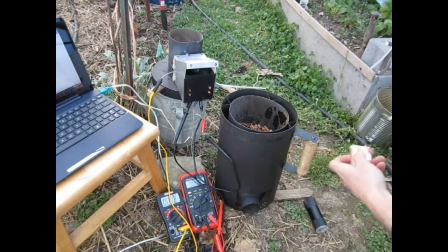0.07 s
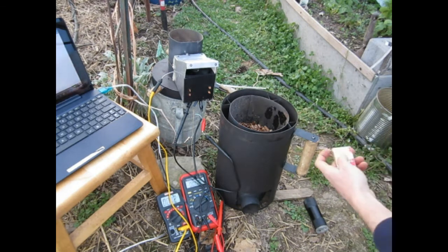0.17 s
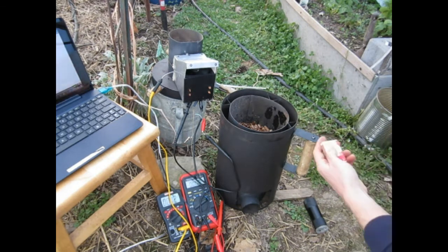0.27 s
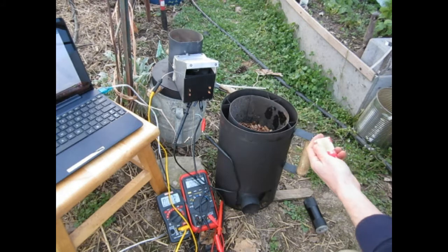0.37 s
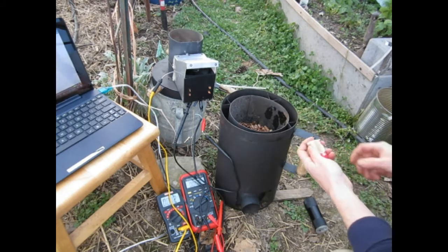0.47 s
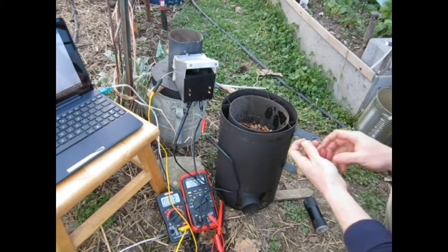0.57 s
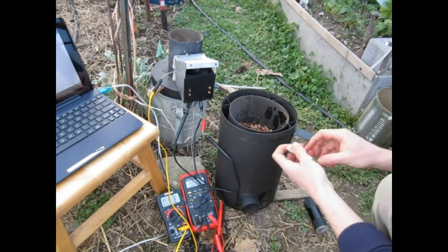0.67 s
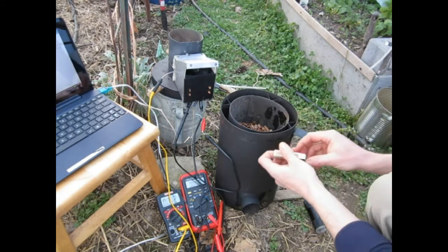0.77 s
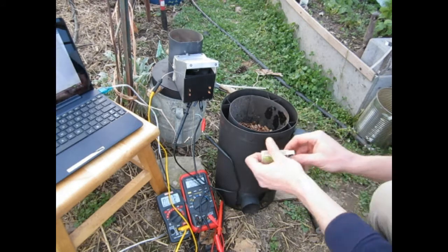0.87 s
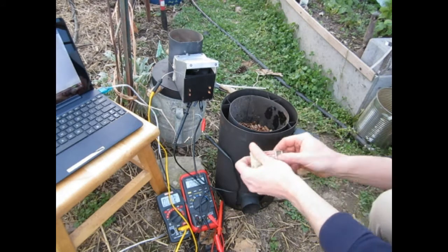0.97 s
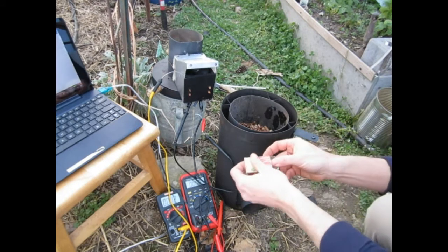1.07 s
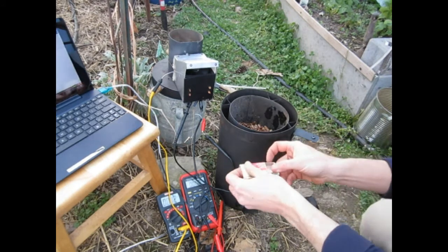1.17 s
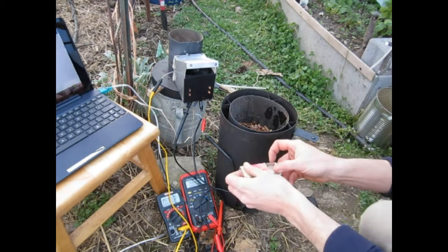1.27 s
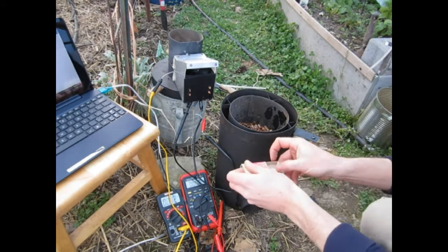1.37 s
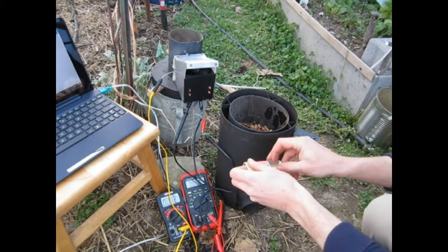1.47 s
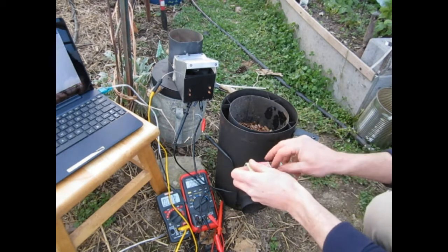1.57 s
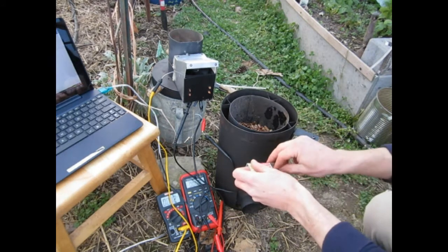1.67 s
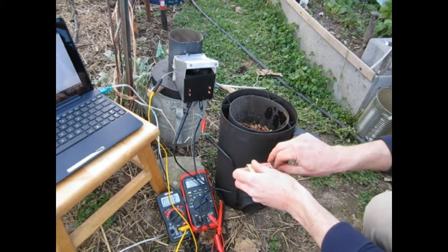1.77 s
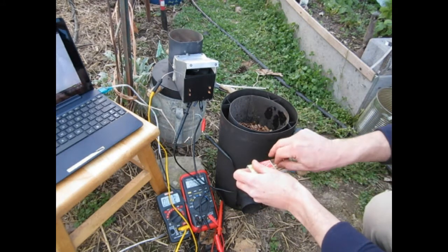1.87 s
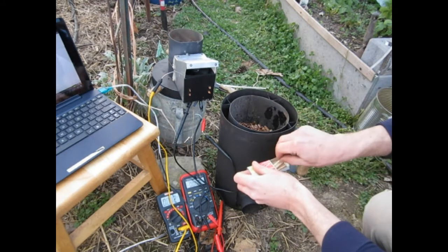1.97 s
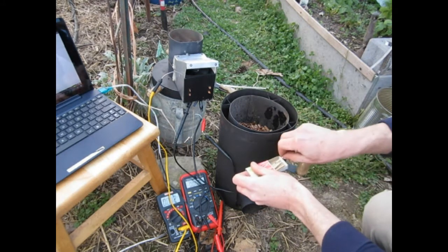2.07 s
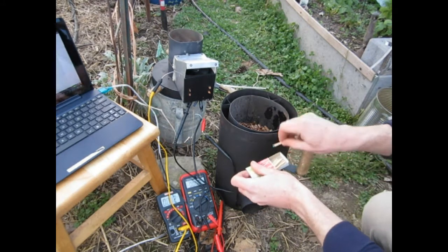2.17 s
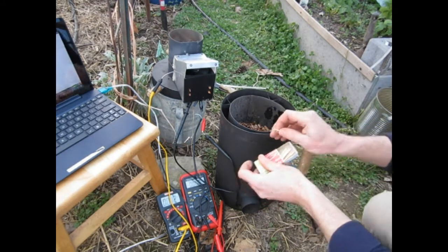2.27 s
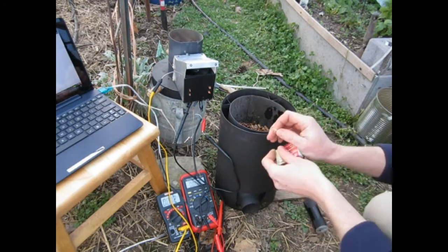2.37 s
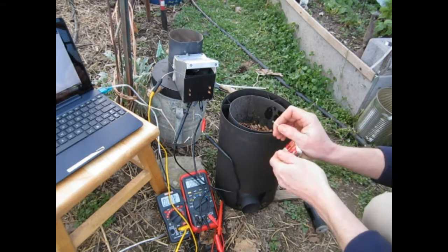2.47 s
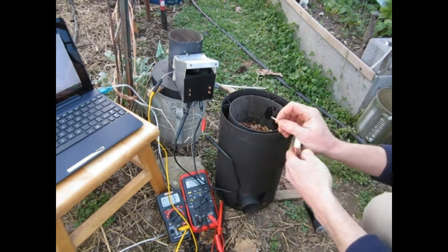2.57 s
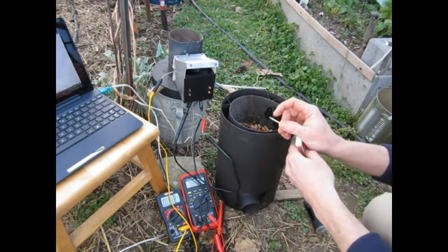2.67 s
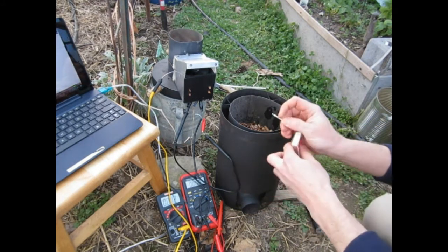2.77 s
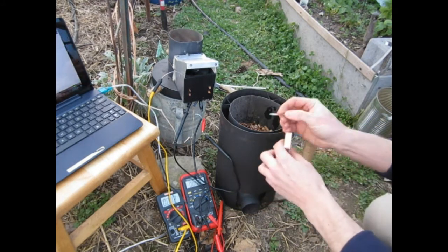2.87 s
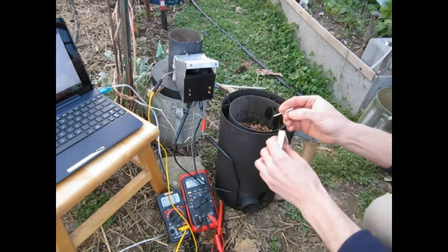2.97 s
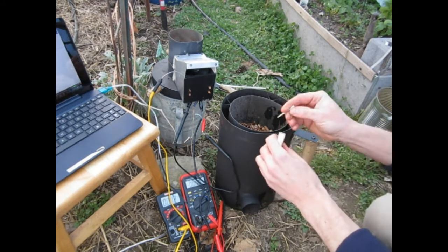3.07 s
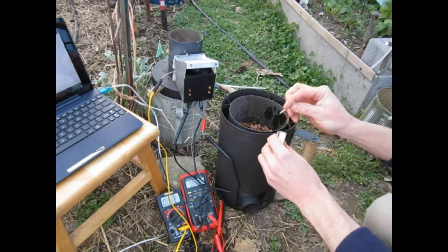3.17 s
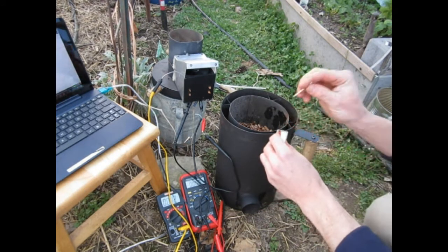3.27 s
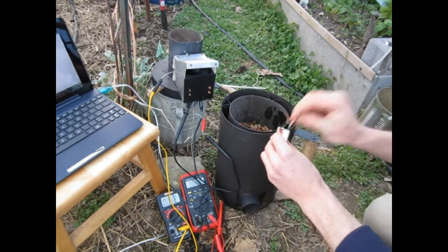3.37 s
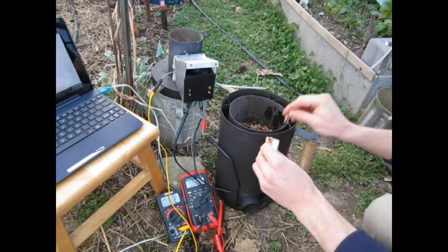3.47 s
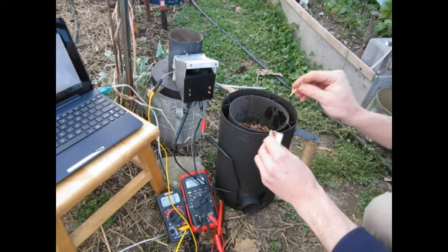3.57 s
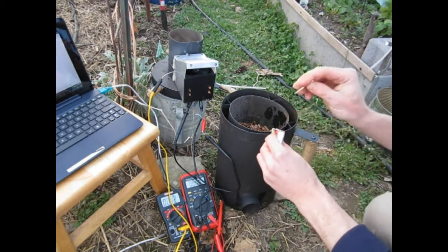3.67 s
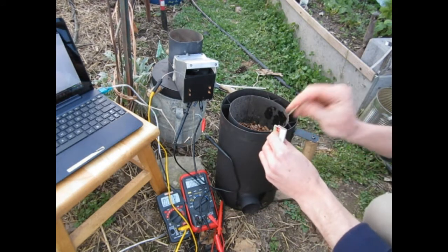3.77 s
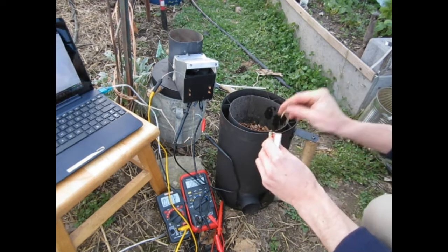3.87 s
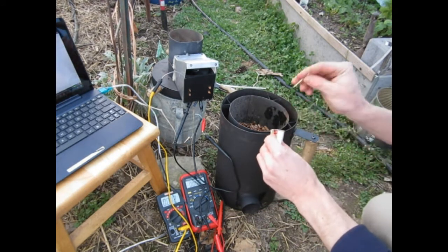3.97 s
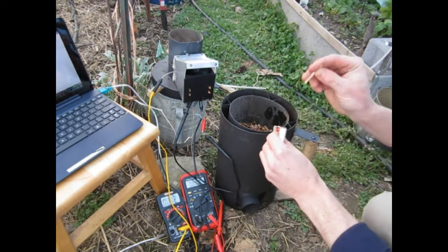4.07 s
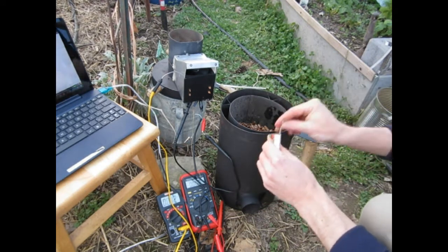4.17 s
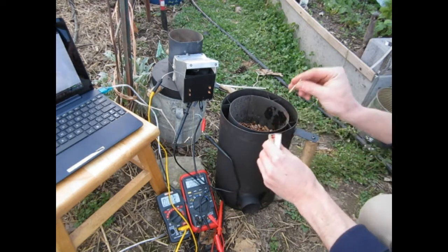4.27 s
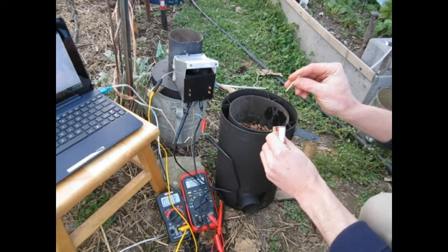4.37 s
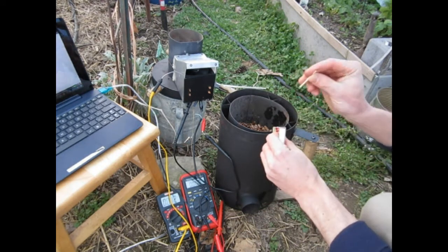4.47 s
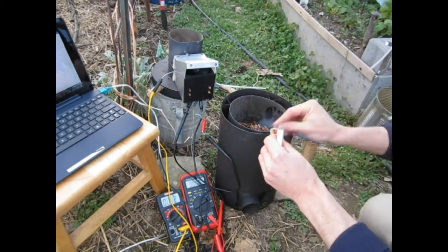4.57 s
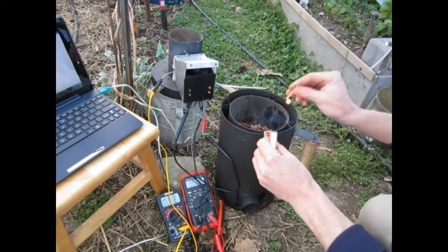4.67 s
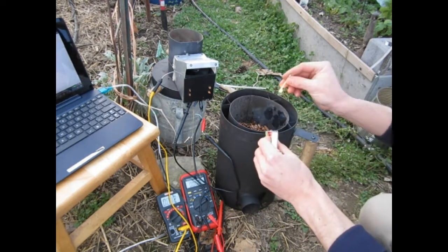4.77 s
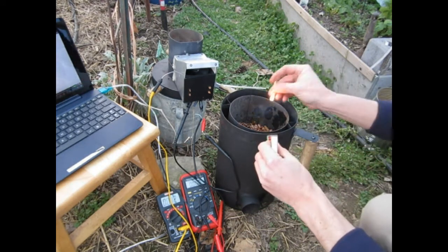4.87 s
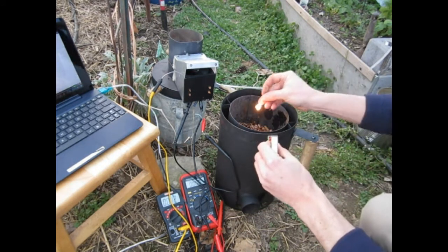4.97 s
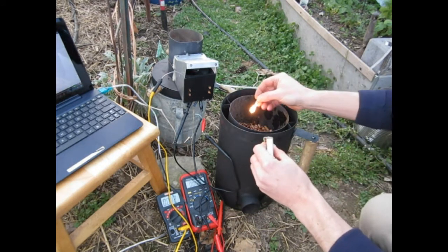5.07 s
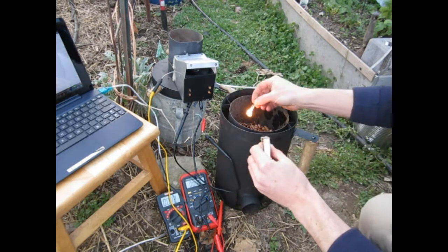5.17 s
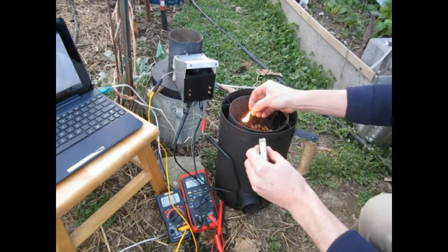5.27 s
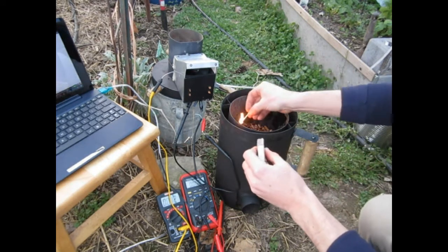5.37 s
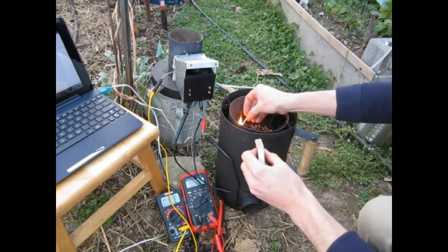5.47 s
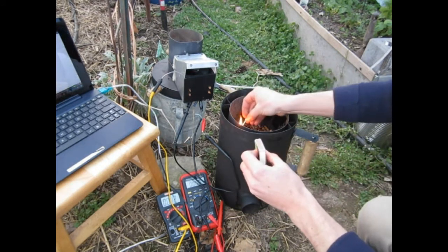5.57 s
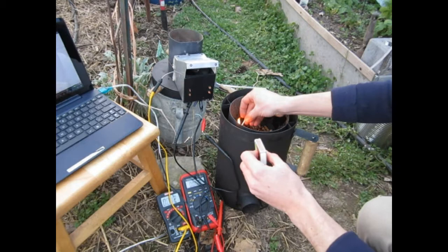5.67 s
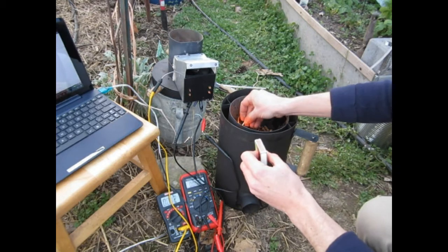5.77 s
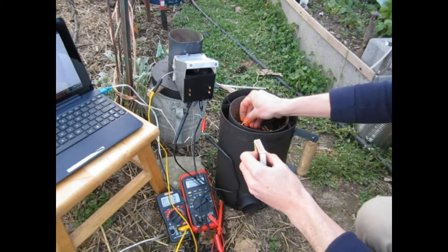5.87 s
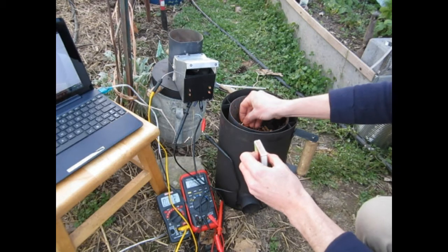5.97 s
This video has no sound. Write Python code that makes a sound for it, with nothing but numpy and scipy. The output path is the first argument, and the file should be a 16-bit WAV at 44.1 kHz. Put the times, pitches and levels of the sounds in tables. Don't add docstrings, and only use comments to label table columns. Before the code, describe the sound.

Outdoors, close to the microphone, hands fumble a small matchbox: dry card slides, hollow knocks, light wooden sticks ticking. The tray snaps shut with bright clacks. Four separate raspy strikes follow, the last by far the loudest, igniting with a thin spit. Fine crackling and fizz continue, briefly hollow inside a drum. Behind lie soft garden hiss, a low distant engine, a faint steady camera whine and a tiny late bird call.

```python
import sys
import numpy as np
from scipy import signal
from scipy.fft import rfft, irfft, next_fast_len
from scipy.io import wavfile
from scipy.ndimage import map_coordinates

SR = 44100
rng = np.random.default_rng(int(sys.argv[2]) if len(sys.argv) > 2 else 0)


def wrap_up_sound(samples):
    columns = np.atleast_2d(samples).T
    tamed = np.clip(columns, -1, 1)
    steps = np.round(tamed * 32767).astype(np.int16)
    wavfile.write(sys.argv[1], SR, steps)


def to_linear_factor(level_db):
    exponent = np.asarray(level_db, float) / 20
    return 10 ** exponent


N = 265041


def unit(x):
    return x / np.sqrt(np.mean(x ** 2) + 1e-20)


def curves(rows):
    time_s, *columns = np.transpose(rows)
    return [np.interp(np.arange(N) / SR, time_s, column) for column in columns]


def phase(hz):
    return 2 * np.pi * np.cumsum(hz) / SR


def shape(points):
    point_hz, point_db = np.transpose(points)
    return lambda f: to_linear_factor(np.interp(np.log(f + 1), np.log(point_hz), point_db, -90, -90))


def modes(table):
    def response(f):
        total = 0
        for k, (hz, width_hz, db) in enumerate(table):
            damping = 1j * f * width_hz
            total = total + (-1) ** k * to_linear_factor(db) * damping / (hz * hz - f * f + damping)
        return total
    return response


def above(edge_hz):
    return lambda f: f * f / (f * f - edge_hz ** 2 - 1.4j * f * edge_hz)


def filtered(x, response):
    m = next_fast_len(len(x) + 4096)
    gain = response(np.fft.rfftfreq(m, 1 / SR))
    gain = gain / np.sqrt(np.mean(np.abs(gain) ** 2))
    return irfft(rfft(x, m) * gain, m)[:len(x)]


def wobble(rate):
    knots = rng.standard_normal(int(N * rate / SR) + 4)
    return map_coordinates(knots, [np.arange(N) * rate / SR])


# start_s, level_db
AIR = [(0, -54.5), (.33, -52), (.9, -51.5), (1.3, -56), (1.74, -58), (2.3, -56.5), (2.86, -59),
       (3.5, -57.5), (4.5, -58), (5.2, -57.5), (6.01, -58)]
# freq_hz, density_db_per_hz
GARDEN = [(13, -71), (22, -14), (110, -15.5), (170, -18), (315, -19), (486, -19.5), (815, -20.5),
          (1440, -25), (3260, -31), (7980, -36), (14500, -42.5)]
# start_s, pitch_hz, level_db
BIRD = [(5.68, 13700, -100), (5.69, 13620, -69), (5.72, 13310, -68), (5.79, 13300, -72.5),
        (5.84, 12100, -76), (5.86, 12750, -72), (5.9, 12500, -72), (5.95, 10600, -86), (5.97, 10500, -100)]


def garden():
    duck_s, duck_db, recover_s = 4.6, 8.5, 0.53
    since_s = np.arange(N) / SR - duck_s
    gain_db = -duck_db * (since_s > 0) * np.exp(-np.abs(since_s / recover_s) ** 2)

    hiss_db = curves(AIR)[0] + gain_db + 4.0 + 0.8 * wobble(6)
    hiss = to_linear_factor(hiss_db) * filtered(rng.standard_normal(N), shape(GARDEN))

    turn = phase(63 + 3.2 * wobble(8))
    drone_db = -55.5 + gain_db + 1.4 * wobble(5.3)
    drone = to_linear_factor(drone_db) * (np.sin(turn) + 0.33 * np.sin(2 * turn))

    call_hz, call_db = curves(BIRD)
    call = to_linear_factor(call_db + 1.1 * wobble(70)) * np.sin(phase(call_hz))

    whine_db = -71.5 + gain_db + 2 * wobble(90)
    whine = to_linear_factor(whine_db) * np.sin(2 * np.pi * 7854 * np.arange(N) / SR + 0.9 * wobble(150))
    return hiss + drone + call + whine


def yard(x):
    hop = SR // 8
    t = np.arange(hop) / SR
    parts = np.pad(x, (0, -N % hop)).reshape(-1, hop)
    tails = rng.standard_normal(parts.shape) * to_linear_factor(-60 * t / 0.093) * (t > 0.002)
    tails = tails / np.linalg.norm(tails, axis=1, keepdims=True)
    wet = signal.fftconvolve(parts, tails, axes=1)
    within = wet[:, :hop].ravel()
    spill = np.pad(wet[:, hop:], ((0, 0), (0, 1))).ravel()
    return (np.pad(within, (0, hop)) + np.pad(spill, (hop, 0)))[:N]


# start_s, peak_db, pitch_hz, t60_s
THUDS = [(0.08, -29.5, 400, 0.019), (0.295, -27.5, 285, 0.013), (0.306, -30, 220, 0.043),
         (2.408, -29, 1010, 0.024), (2.78, -36.5, 850, 0.053), (3.344, -46, 1100, 0.093),
         (3.437, -28, 356, 0.009), (3.849, -28, 1130, 0.017), (3.968, -49, 620, 0.08),
         (4.185, -28.5, 292, 0.03), (4.186, -24, 564, 0.014), (4.591, -34.5, 940, 0.059),
         (4.594, -37.5, 372, 0.04), (4.903, -46.5, 784, 0.027), (5.822, -50.5, 830, 0.046),
         (5.878, -50, 490, 0.045)]


def thuds():
    x, t = np.zeros(N + SR), np.arange(SR // 6) / SR
    for start_s, peak_db, hz, t60_s in THUDS:
        clean = np.clip(1.4 - hz / 600, 0.2, 1)
        body = modes([(hz, 1.1 * hz, 0)])
        noise = rng.standard_normal(len(t))
        rustle = unit(filtered(noise, lambda f: body(f) ** 2 * above(200)(f)))
        swing = clean * np.sin(2 * np.pi * hz * t) + (1.1 - clean) * rustle
        decay = to_linear_factor(peak_db + 6.0 - 60 * t / np.clip(t60_s, 0.008, 0.2))
        x[round(start_s * SR):][:len(t)] += decay * (1 - np.exp(-t / 0.0013)) * swing
    return x[:N]


# fastest_s, rise_s, fall_s, rasp_db, box_db
SLIDES = [(0.3, 1, 1, -43.5, -43), (0.52, 0.033, 0.047, -56, -40), (0.728, 0.021, 0.03, -35.5, -34.5),
          (0.605, 0.028, 0.047, -39, -36.5), (0.76, 0.07, 0.62, -52, -40.5), (1.05, 0.99, 0.11, -37, -39.5),
          (1.2, 0.076, 0.1, -34.5, -33), (1.27, 0.12, 0.025, -46, -38), (1.372, 0.059, 0.13, -39, -34.5),
          (1.415, 0.12, 0.019, -44, -37.5), (1.5, 0.067, 0.2, -48.5, -45),
          (1.612, 0.029, 0.078, -44, -37.5), (1.704, 0.14, 0.1, -39, -39.5),
          (1.865, 0.1, 0.068, -39, -36.5), (2.061, 0.11, 0.018, -45, -34), (2.2, 0.017, 0.065, -45, -40.5),
          (2.24, 0.074, 0.014, -44.5, -40.5), (2.294, .012, 0.022, -53, -43.5),
          (2.35, 0.075, .05, -56, -46), (2.363, 0.0062, 0.079, -23, -22), (2.386, 0.02, 0.04, -18, -30),
          (2.406, 0.033, .008, -26, -29), (2.44, 0.073, 0.025, -36, -37), (2.53, 0.049, 0.15, -45.5, -43.5),
          (2.652, 0.02, 0.018, -18, -15), (2.68, 0.023, 0.98, -61, -43.5), (2.75, .06, 0.07, -42.5, -50),
          (2.903, 0.014, 0.15, -44, -37.5), (3.04, 0.083, 0.052, -44.5, -62),
          (3.167, 0.039, 0.034, -42.5, -39.5)]
# fastest_s, rise_s, fall_s, rasp_db, box_db
SCRAPES = [(3.347, .003, 0.031, -44, -60), (3.35, 0.036, 0.079, -63, -39),
           (3.439, 0.0022, 0.055, -30.5, -42), (3.538, .04, 0.017, -36, -47),
           (3.51, 0.082, 0.088, -46, -43), (3.58, .05, 0.061, -61, -46.5), (3.854, .002, 0.078, -29.5, -33),
           (3.945, 0.065, 0.081, -52, -37.5), (4.186, 0.0017, 0.061, -36, -25),
           (4.257, 0.032, 0.058, -33, -32.5), (4.596, 0.0034, 0.0067, -13.5, -22),
           (4.604, 0.017, .003, -28, -24.5), (4.616, .005, 0.1, -36.5, -38),
           (4.991, 0.018, 0.031, -56, -48), (5.075, 0.03, 0.075, -51, -51), (5.286, 0.79, 0.31, -57.5, -54)]


def pressure():
    span_db = 20
    box_swing = 1.24
    fastest_s, rise_s, fall_s, rasp_db, box_db = np.transpose(SLIDES + SCRAPES)[:, :, None]
    crest = np.repeat([1.09, 1], [len(SLIDES), len(SCRAPES)])[:, None]
    t = np.arange(0, N + 44, 44) / SR
    away = np.maximum((fastest_s - t) / np.abs(rise_s), (t - fastest_s) / np.abs(fall_s))
    loss_db = -span_db * away ** crest
    box = np.sqrt((to_linear_factor(box_db + box_swing * loss_db) ** 2).sum(0))
    rasp = np.sqrt((to_linear_factor(rasp_db + loss_db) ** 2).sum(0))
    return [np.interp(np.arange(N) / SR, t, gain) for gain in (box, rasp)]


def moving_band(turn, clumps):
    def slow():
        return filtered(to_linear_factor(clumps) * rng.standard_normal(N), lambda f: 1 / (1 + (f / 400) ** 2))
    return unit(slow() * np.sin(turn) + slow() * np.cos(turn))


# freq_hz, width_hz, level_db
BOX = [(1570, 280, -0.5), (2090, 290, 3), (2700, 1900, -5.5)]
# freq_hz, density_db_per_hz
RASP = [(1650, -42), (2800, -15), (4550, -9), (4880, -6), (6370, -6), (9160, -7.5), (12500, -9.5),
        (14400, -21)]
# start_s, resonance_hz, freedom_0_to_1
CARD = [(0, 1900, 0), (.8, 2649, 0.42), (1.05, 2200, 0.1), (1.2, 2300, 0.8), (1.4, 2556, 0.64),
        (1.62, 2300, 0.3), (1.72, 2150, 1), (1.85, 2700, 0.64), (2.05, 2947, 0.55), (2.2, 2400, 0.3),
        (2.38, 2600, 0.7), (2.45, 1700, 0.86), (2.65, 1600, 0.37), (2.72, 2092, 0), (3.3, 2100, 0.46),
        (6.01, 2130, 0.4)]


def friction():
    box, rasp = pressure()
    clumps_db = 1.5 * wobble(120) + 0.82 * wobble(500)
    grit = unit(to_linear_factor(clumps_db) * rng.standard_normal(N))
    walls = modes(BOX)
    body = filtered(grit, lambda f: walls(f) * f ** 2 / (f ** 2 + 1300 ** 2))

    card_hz, free = curves(CARD)
    turn = phase(card_hz)
    card = moving_band(turn, clumps_db)
    overtone = moving_band(1.98 * turn, clumps_db)

    low = to_linear_factor(-3.5) * box * (0.7 * body + free * card)
    high = to_linear_factor(-5.5) * rasp * (filtered(grit, shape(RASP)) + 0.97 * free * overtone)
    return low + high


# start_s, peak_db, pitch_hz
SNAPS = [(0.2429, -9.5, 5430), (1.863, -23, 4070), (2.6686, -12, 8500), (2.6706, -16, 8500),
         (2.675, -8.5, 8500), (3.851, -11.5, 5570), (4.5914, -16, 11600), (4.5913, -7, 9000),
         (5.058, -29, 6000), (5.0616, -27, 6000), (5.0637, -27, 6000)]


def snaps():
    x, t = np.zeros(N), np.arange(64) / SR
    for start_s, peak_db, hz in SNAPS:
        x[round(start_s * SR):][:len(t)] += to_linear_factor(peak_db + 6.0 - 25 * hz * t) * np.sin(2 * np.pi * hz * t)
    return filtered(x, above(1060))


# freq_hz, width_hz, level_db
EDGE = [(8000, 6200, 4), (12500, 3000, -0.5)]


def contacts(rows, body, low_hz, edge_db):
    edge_grows = 0.33
    scatter_db = 3
    t = np.arange(SR // 40) / SR
    click = t == 0
    soft, hard, rings = np.zeros((3, N + SR))
    for start_s, peak_db, ring_hz, ring_db in rows:
        rattle, lumps, push = rng.standard_normal((3, len(t)))
        span = slice(round(start_s * SR), round(start_s * SR) + len(t))
        burst = to_linear_factor(-60 * t / 0.02 + 3.5 * lumps) * rattle + 4.6 * click
        soft[span] += to_linear_factor(peak_db - 13.5) * burst
        hard[span] += to_linear_factor((1 + edge_grows) * peak_db + edge_db + scatter_db * push[-1] - 6.5) * burst
        wall = to_linear_factor(-60 * t * ring_hz / 16) * np.sin(2 * np.pi * ring_hz * t)
        ring = signal.fftconvolve(to_linear_factor(-60 * t / 0.017) * (push + 4 * click), wall)[:len(t)]
        rings[span] += to_linear_factor(peak_db + ring_db + 6.5) * ring / np.abs(ring).max()
    x = rings[:N] + filtered(soft[:N], modes(body))
    x = x + filtered(hard[:N], lambda f: modes(EDGE)(f) * above(5000)(f))
    return filtered(x, lambda f: above(low_hz)(f) ** 2)


def ticks(rows, ring_db):
    return [(*row, ring_db) for row in rows]


# freq_hz, width_hz, level_db
HOLLOW = [(1500, 2600, 5), (3200, 1700, 3)]
# start_s, peak_db, ring_hz, ring_db
FIDGETS = [(0.0964, -22, 1670, -14.5), (0.2935, -21.5, 1240, -15), (0.3058, -20, 1190, -13.5),
           (2.3316, -35, 1290, -9), (3.3296, -43.5, 2080, -2), (3.3452, -33, 1500, -28),
           (3.7365, -33, 1680, -19), (4.4729, -37.5, 1360, -10), (4.794, -35.5, 1340, -13.5),
           (4.9824, -34.5, 3250, -10), (5.0419, -35, 2480, -14), (5.281, -30, 1600, -17),
           (5.288, -31.5, 1110, -16), (5.834, -44, 2500, -14), (5.88, -28.5, 1300, -16.5)]
# start_s, peak_db, ring_hz, ring_db
NAILS = [(3.706, -47, 1320, -17), (3.714, -47, 1320, -23), (4.15, -48, 1320, -23)]


def fingers():
    x = contacts(FIDGETS, HOLLOW, low_hz=465, edge_db=-29)
    return x + contacts(NAILS, EDGE, low_hz=8500, edge_db=17.0)


# freq_hz, width_hz, level_db
STICK = [(2200, 660, 5.5), (3700, 650, 4), (4530, 400, 10), (6170, 910, 5)]
# start_s, peak_db, ring_hz, ring_db
OPENING = [(0.2285, -21, 3400, -13), (0.2424, -15.5, 1890, -14.5), (0.2554, -27, 2570, -21),
           (0.597, -29.5, 1640, -2), (0.618, -33, 1750, -1), (0.727, -30, 1800, -18),
           (0.9238, -26, 3130, -17), (0.9851, -36, 2700, 2.5), (1.0018, -20, 2250, -10),
           (1.0355, -14.5, 2150, -17), (1.0391, -29, 2750, -17), (1.0598, -9.5, 2230, -11.5),
           (1.142, -24, 2200, -11), (1.33, -39, 2120, -3.5), (1.455, -23, 2080, -13), ]
# start_s, peak_db, ring_hz, ring_db
PICKING = [(1.5995, -22, 3500, -13), (1.6142, -17, 2290, -2.5), (1.668, -22, 2730, -10),
           (1.677, -15, 2770, -17), (1.7006, -17, 2470, -6.5), (1.7132, -24, 4120, -5),
           (1.7235, -15, 4100, -11), (1.7385, -22.5, 2650, -12), (1.805, -32, 2230, -4),
           (1.8175, -22, 2700, -14), (1.8284, -31, 3140, 3), (1.8627, -10.5, 3700, -11.5),
           (1.9235, -30.5, 1650, -5.5), (2.064, -16.5, 2930, -12.5)]
# start_s, peak_db, ring_hz, ring_db
CLOSING = [(2.3607, -10.5, 3080, -11), (2.3708, -13.5, 2700, -9), (2.4078, -21, 1430, -7.5),
           (2.4328, -16.5, 1800, -3.5), (2.4404, -23.5, 1990, -2.5), (2.4663, -27.5, 2140, -7),
           (2.5139, -30.5, 2420, -12), (2.6345, -33, 1970, 2), (2.6384, -26, 1500, 4),
           (2.6508, -5, 2140, -7), (2.656, -14, 1600, -1.5), (2.6665, -27, 4900, -25),
           (2.6704, -13, 8300, -8), (2.6918, -17.5, 1970, -3), (2.7044, -19, 2090, -7),
           (2.7078, -15.5, 1970, -12), (2.73, -27, 1990, -5), (2.7404, -29, 1840, 3),
           (2.7887, -34, 1940, 2), (2.8038, -37, 2660, 1.5), (2.8504, -39, 4000, -7),
           (2.8874, -33, 2140, -2), (2.8978, -22, 1570, -7.5), (2.9323, -28.5, 3600, -6.5),
           (3.1463, -26, 3820, -5.5), (3.1668, -20.5, 3720, -13.5)]
# start_s, peak_db, ring_hz
RATTLE = [(0.2115, -26, 1210), (0.6468, -45, 4500), (0.7433, -31, 2580), (0.7627, -39, 1890),
          (0.7882, -48, 5730), (0.8422, -30, 2630), (0.8672, -28, 2700), (0.91, -31, 2470),
          (0.9967, -35, 2870), (1.0077, -21.5, 2260), (1.0173, -30, 2130), (1.041, -21, 2860),
          (1.0521, -27, 2140), (1.0766, -24.5, 2150), (1.183, -23, 5180), (1.188, -28, 4670),
          (1.1954, -27, 2100), (1.2093, -33, 2150), (1.2389, -31, 2350), (1.2821, -37, 2700),
          (1.3676, -30, 2020), (1.4037, -29, 5080), (1.6521, -25, 3150), (1.6981, -31, 2200),
          (1.7189, -24, 4200), (1.7523, -27.5, 2670), (1.8366, -27, 2200), (1.8509, -30, 2160),
          (1.8739, -27, 3770), (1.8876, -34, 3640), (1.907, -28, 3400), (2.0458, -23.5, 2950),
          (2.1405, -50, 3000)]
# start_s, peak_db, ring_hz
SHUT = [(2.3503, -38, 5920), (2.3795, -16, 6370), (2.3945, -11.5, 4970), (2.4459, -29, 1490),
        (2.4568, -31, 2780), (2.4786, -31, 2170), (2.4898, -34, 1510), (2.6086, -41, 8000),
        (2.6198, -38, 4220), (2.6443, -19, 2020), (2.6645, -19, 3940), (2.6679, -7.5, 8150),
        (2.6742, -18, 4530), (2.6999, -26, 1980), (2.7165, -24, 1970), (2.727, -35, 2020),
        (2.7986, -29, 1490), (2.8108, -36, 1870), (2.9208, -42, 5330), (2.961, -29, 1210),
        (2.994, -36, 1500), (3.1569, -40, 3730)]


def sticks():
    x = contacts(OPENING, STICK, low_hz=1430, edge_db=-9.0)
    x = x + contacts(PICKING, STICK, low_hz=1640, edge_db=-7.0)
    x = x + contacts(CLOSING, STICK, low_hz=1190, edge_db=-6.0)
    x = x + contacts(ticks(RATTLE, ring_db=-7.5), STICK, low_hz=1500, edge_db=-19)
    return x + contacts(ticks(SHUT, ring_db=-8.5), STICK, low_hz=1210, edge_db=-9)


# freq_hz, width_hz, level_db
STRIP = [(1600, 1900, -6.5), (3400, 2500, -0.5), (6260, 2500, -0.5)]
# start_s, peak_db, ring_hz
SKIPS = [(3.3649, -32.5, 2050), (3.463, -28, 5620), (3.4777, -29, 2580), (3.5032, -17, 5460),
         (3.5143, -27, 2200), (3.5269, -27, 2140), (3.5327, -27, 3810), (3.5395, -26, 4090),
         (3.5787, -35.5, 1940), (3.8491, -10, 5560), (3.8517, -12.5, 4100), (3.8575, -29, 4200),
         (3.8784, -26, 3300), (3.8843, -27, 3700), (3.9087, -34, 3640), (3.9138, -35, 5280),
         (3.9326, -36, 3730), (3.9423, -22, 3600), (4.1878, -8.5, 4400), (4.1945, -29, 3000),
         (4.2274, -28, 3600), (4.2454, -19, 3190), (4.2646, -34, 3900), (4.2777, -26, 5230),
         (4.2942, -33, 3790), (4.3061, -34, 2000)]
# start_s, peak_db, ring_hz, ring_db
STRIKES = [(3.4373, -18.5, 1670, -14.5), (3.4452, -19.5, 3390, -28), (3.4872, -22.5, 3070, -20),
           (3.5, -34, 2220, -1), (3.5065, -16.5, 2330, -18), (3.5222, -20, 2640, -22),
           (3.5363, -28, 2760, -18), (3.5745, -34, 3120, -8.5), (3.8489, -13.5, 2010, -14.5),
           (3.9022, -21.5, 1700, -25), (3.924, -23, 2500, -24), (3.9388, -31, 1830, -25),
           (3.9482, -19.5, 2030, -27), (4.1862, -8, 1420, -14.5), (4.2019, -9.5, 3200, -11.5),
           (4.2166, -18, 2100, -9.5), (4.2389, -16, 2600, -20), (4.2541, -14, 2090, -21),
           (4.2587, -17.5, 2700, -14), (4.2689, -16, 2900, -35), (4.5904, 1.5, 1720, -20.5),
           (4.5925, -4.5, 3230, -13.5), (4.6005, -21, 2000, -24)]


def strikes():
    x = contacts(ticks(SKIPS, ring_db=-11), STRIP, low_hz=1500, edge_db=-12)
    return x + contacts(STRIKES, STRIP, low_hz=745, edge_db=-5.5)


# start_s, peak_db, ring_hz, ring_db
IGNITION = [(4.591, -18, 12200, 5)]


def ignition():
    return contacts(IGNITION, EDGE, low_hz=9000, edge_db=15.5)


# start_s, peak_db
POPS = [(4.6522, -31), (4.6625, -35), (4.671, -35), (4.676, -36), (4.6811, -43), (4.6952, -42),
        (4.716, -41), (4.7234, -41), (4.7675, -40), (4.7829, -47), (4.795, -45), (4.8039, -47),
        (4.833, -41), (4.8411, -40), (4.854, -33), (4.9476, -41), (4.9823, -46), (4.987, -33.5),
        (4.9967, -46), (5.0266, -47), (5.0451, -52), (5.0524, -52), (5.0582, -35), (5.063, -32),
        (5.074, -37), (5.085, -35), (5.0945, -40), (5.098, -34), (5.106, -45), (5.1107, -46), (5.126, -48),
        (5.1348, -49), (5.1512, -35), (5.161, -40), (5.1655, -41), (5.1718, -40), (5.1794, -48),
        (5.196, -35), (5.207, -34), (5.211, -30), (5.2241, -33), (5.2311, -37),
        (5.2455, -37), (5.2561, -42), (5.2605, -33.5), (5.27, -46), (5.2771, -44), (5.2817, -39),
           (5.299, -33.5), (5.3188, -32.5), (5.3393, -37), (5.3644, -42), (5.368, -32), (5.382, -33),
           (5.389, -41), (5.3959, -32), (5.4023, -38), (5.406, -29), (5.4113, -34), (5.4234, -38),
           (5.428, -44), (5.431, -36), (5.4694, -42), (5.476, -34), (5.4995, -39), (5.5061, -45),
           (5.5106, -40), (5.5196, -28), (5.5476, -35), (5.562, -36), (5.575, -51), (5.5879, -47),
           (5.594, -30), (5.6007, -32), (5.6048, -31), (5.6235, -34), (5.626, -33), (5.639, -30),
           (5.6543, -50), (5.681, -38), (5.687, -39), (5.703, -43), (5.716, -33), (5.7644, -52),
           (5.798, -38), (5.8161, -42), (5.8345, -44)]
# start_s, level_db
FLAME = [(4.7, -71.5), (5.12, -79), (5.2, -69), (5.3, -77), (5.4, -72), (5.62, -65.5), (5.75, -70),
         (6.01, -84)]
# freq_hz, width_hz, level_db
GAS = [(5030, 2300, 0.5), (6800, 1800, 2), (10800, 5020, -2.5)]
# start_s, peak_db
PUFFS = [(5.114, -48.5), (5.174, -47), (5.229, -48), (5.289, -45.5), (5.38, -43), (5.412, -47),
         (5.494, -50), (5.575, -47), (5.625, -46), (5.687, -44), (5.798, -52)]
# freq_hz, width_hz, level_db
DRUM = [(588, 52, -6), (1500, 670, -17)]
# start_s, delay_ms
ECHO = [(5.05, .5), (5.2, .46), (5.36, .385), (5.75, .385)]


def flame():
    start_s, peak_db = np.transpose(POPS)
    low_pops, high_pops = np.zeros((2, N))
    at, sign = np.round(start_s * SR).astype(int), rng.choice([-1, 1], len(start_s))
    low_pops[at] = to_linear_factor(peak_db + 3.0) * sign
    high_pops[at] = to_linear_factor(peak_db - 9) * sign

    sizes = to_linear_factor(np.minimum(4 * rng.exponential(size=N), 6))
    sparks = rng.random(N) < 0.012 * to_linear_factor(2 * wobble(40))
    fizz = to_linear_factor(curves(FLAME)[0]) * unit(sizes * sparks * rng.choice([-1, 1], N))
    x = filtered(low_pops + fizz, modes([(4900, 2900, 0)]))
    x = x + filtered(high_pops + 0.19 * fizz, modes(EDGE))

    t = np.arange(800) / SR
    sputter = signal.fftconvolve(np.abs(low_pops + fizz), to_linear_factor(-17 - 60 * t / 0.015))[:N]
    x = x + filtered(sputter * rng.standard_normal(N), modes(GAS))

    puffs = np.zeros(N)
    for puff_s, puff_db in PUFFS:
        puffs[round(puff_s * SR)] += to_linear_factor(puff_db + 19.0)
    x = x + filtered(puffs, modes(DRUM))

    n = np.arange(N)
    echo_ms = curves(ECHO)[0] * (1 + 0.03 * wobble(25))
    delay = echo_ms * SR / 1000
    return sum(gain * np.interp(n - k * delay, n, x) for k, gain in enumerate([1, 0.4, 0.1]))


def scene():
    hits = thuds() + snaps() + fingers() + sticks() + strikes()
    mix = garden() + to_linear_factor(-10) * yard(hits) + friction() + hits + ignition() + flame()
    return mix[None]


def top_cut(x):
    return signal.sosfilt(signal.butter(12, 15460, fs=SR, output="sos"), x)


def record(dry):
    dry = dry / (1 + np.abs(dry / 0.8) ** 6) ** (1 / 6)
    m = next_fast_len(N + 4096)
    loss_db = np.clip((np.fft.rfftfreq(m, 1 / SR) - 14100) * 0.048, 0, 34)
    mix = irfft(rfft(dry, m) * to_linear_factor(-loss_db), m)[:, :N]
    return top_cut(mix)


dry = scene()
out = record(dry)
wrap_up_sound(out)
```